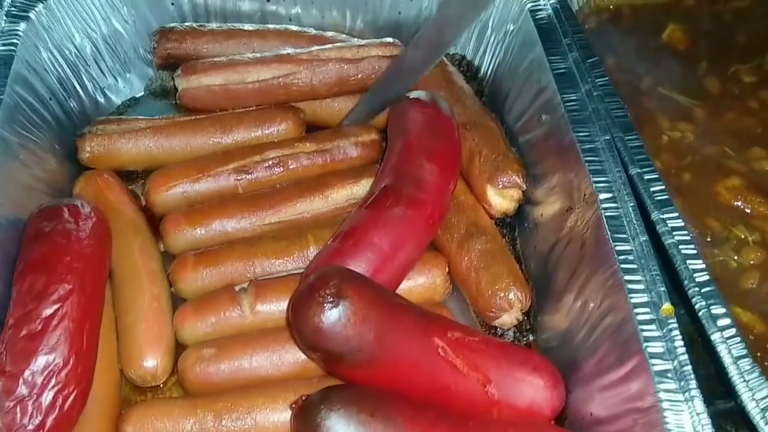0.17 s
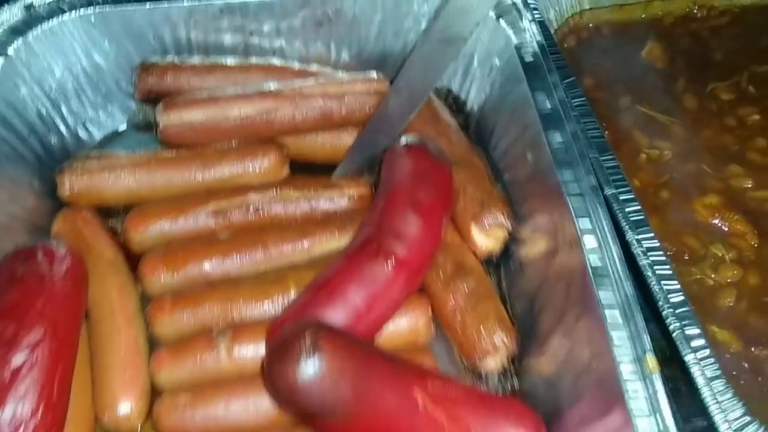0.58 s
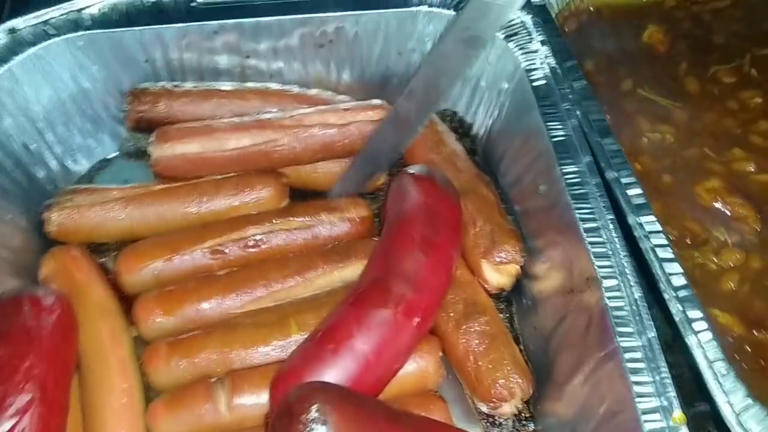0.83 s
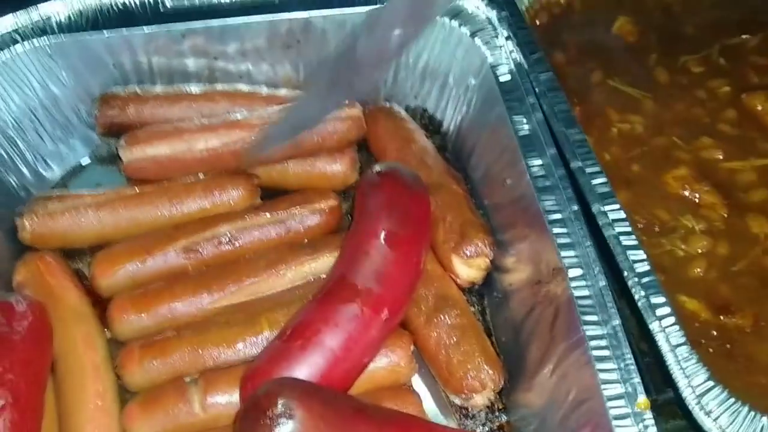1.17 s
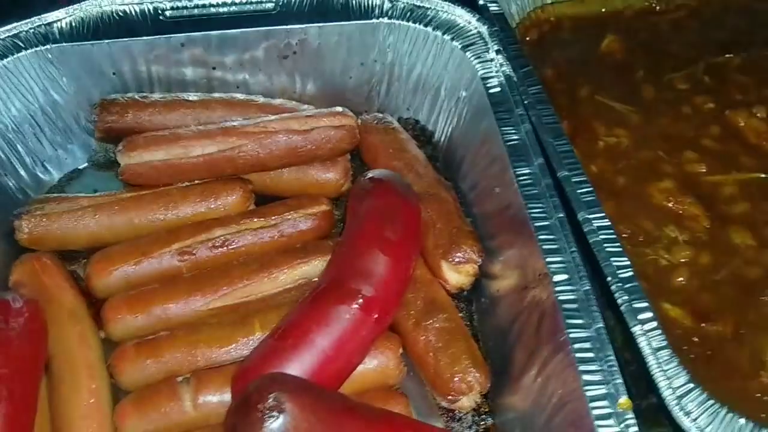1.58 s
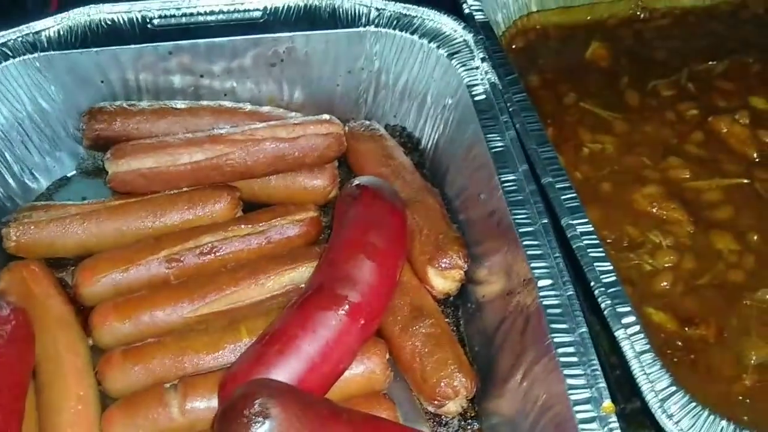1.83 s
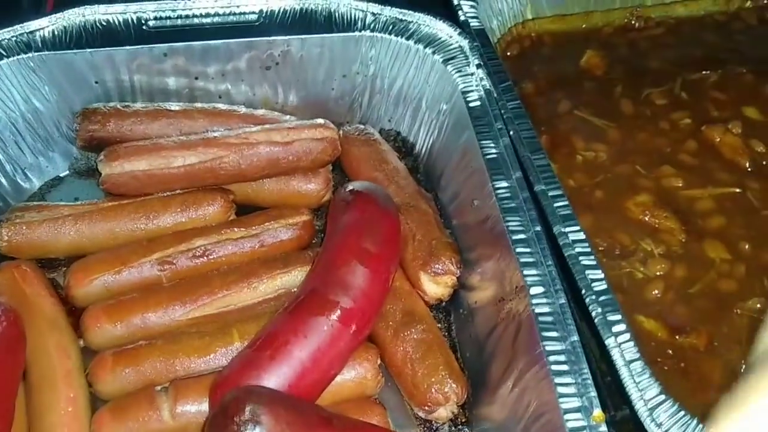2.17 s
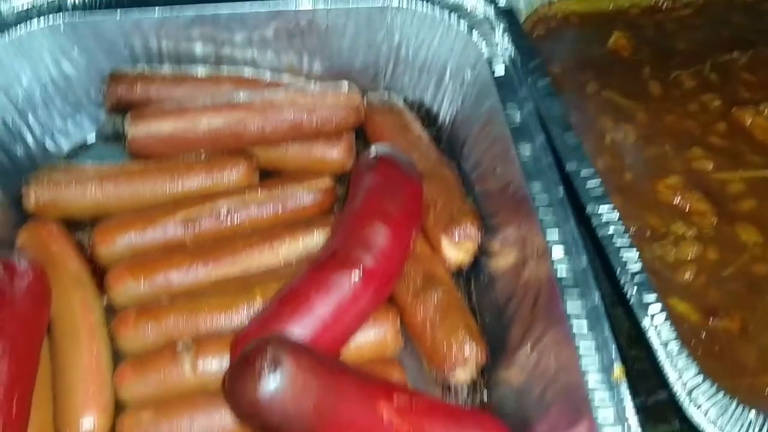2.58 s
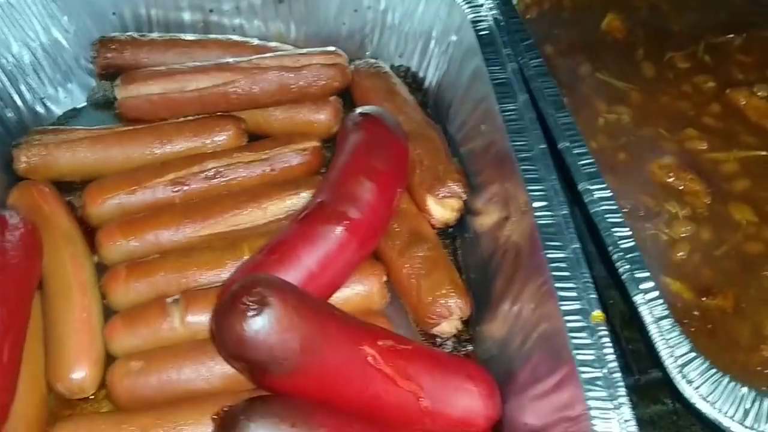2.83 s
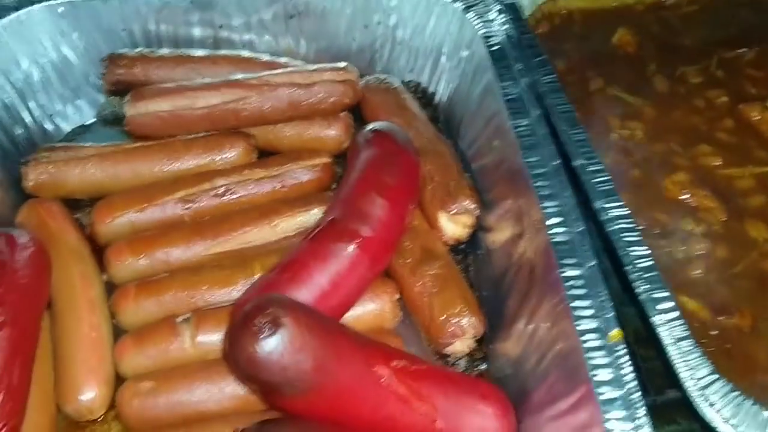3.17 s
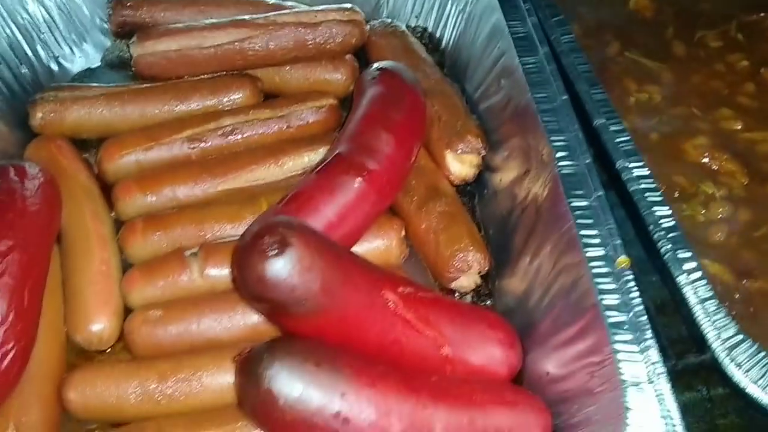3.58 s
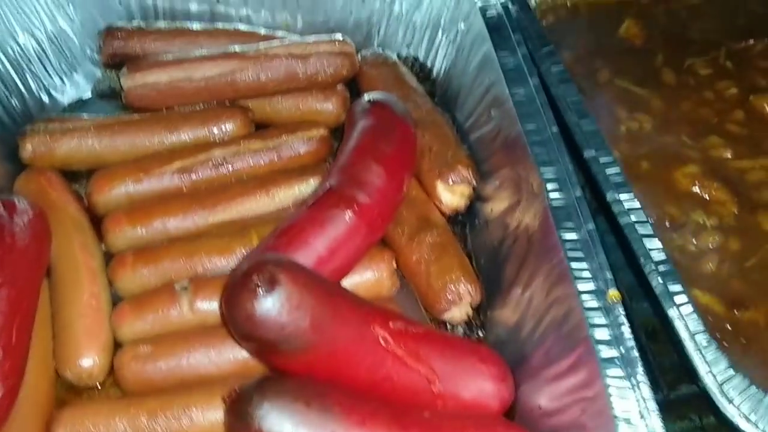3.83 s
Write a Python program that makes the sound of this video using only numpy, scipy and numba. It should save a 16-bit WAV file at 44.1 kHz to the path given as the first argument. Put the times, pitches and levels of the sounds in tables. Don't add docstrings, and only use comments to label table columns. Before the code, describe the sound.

Close, crinkly knocks and short sticky scrapes of a blade on an aluminium tray, with buckling pops and quiet pauses in a humming kitchen.

```python
import sys
import numpy as np
from scipy import signal
from scipy.fft import rfft, irfft
from scipy.io import wavfile
from scipy.ndimage import uniform_filter1d
from numba import njit

SR = 44100
rng = np.random.default_rng(int(sys.argv[2]) if len(sys.argv) > 2 else 0)


def waveform_to_disk(signal):
    frames = np.transpose(np.atleast_2d(signal))
    scaled = np.clip(frames, -1, 1) * 32767
    samples = np.round(scaled).astype(np.int16)
    wavfile.write(sys.argv[1], SR, samples)


def rack_gain(trim_db):
    fader = np.asarray(trim_db, float)
    return 10 ** (fader / 20)


N = 176708

# start_s, length_s, pressure_db, patch_pitch_hz, brightness_db
STROKES = [(0.467, 0.099, -43, 870, 8.5), (0.588, 0.019, -33, 900, -4), (0.616, 0.021, -33.5, 860, 2),
           (0.643, 0.11, -26, 860, 1), (0.723, 0.071, -36.5, 610, -1), (0.769, 0.23, -31, 760, -2.5),
           (0.912, 0.049, -32.5, 1180, -1.5), (1.229, 0.016, -28, 1111, -10.5),
           (1.719, 0.031, -29.5, 800, 11), (2.125, 0.021, -36, 897, -2), (2.442, 0.035, -46.5, 635, -18),
           (2.507, 0.16, -51, 790, -2), (2.697, 0.022, -41.5, 855, -6), (2.731, 0.075, -32, 743, -4.5),
           (2.822, 0.074, -30.5, 774, -5), (3.539, 0.025, -20, 744, -13)]
# centre_s, half_width_s, pressure_db, patch_pitch_hz, brightness_db
SWELLS = [(1.032, 0.013, -29, 1150, -2.5), (1.064, 0.021, -44.5, 1190, -25), (1.097, 0.026, -24.5, 1130, 2),
          (1.447, 0.024, -56.5, 1110, -25.5), (2.222, 0.024, -37.5, 785, 1.5), (3.373, 0.03, -51, 765, -29),
          (3.422, 0.019, -34, 760, -11.5), (3.469, 0.017, -32.5, 915, -8.5),
          (3.502, 0.0112, -30, 1000, -18), (3.528, 0.011, -31.5, 1060, -3), (3.587, 0.034, -43.5, 774, -2),
          (3.764, 0.017, -45, 765, 15), (3.795, 0.024, -41, 900, 12), (0.665, 0.0032, -44, 1000, -11),
          (3.988, 0.034, -75, 599, 25.5)]
BODY_SIDE_DB = -8
CLANG_SHARE = 0.57


def unit(x):
    return x / np.sqrt(np.mean(x ** 2))


def band(x, hz, width):
    low = np.sqrt(hz ** 2 + width ** 2 / 4) - width / 2
    edges = [low, min(low + width, 0.45 * SR)]
    return signal.sosfilt(signal.butter(2, edges, "bandpass", fs=SR, output="sos"), x)


def fade(t60, count):
    return rack_gain(-60 * np.arange(count) / SR / np.clip(t60, 0.01, 1.0))


def place(track, sound, start_s):
    i = int(start_s * SR)
    track[:, i:i + sound.shape[-1]] += sound


@njit
def moving_band(x, hz, share):
    out, band_state, low_state = np.empty(len(x)), 0.0, 0.0
    for i in range(len(x)):
        g = np.tan(np.pi * hz[i] / SR)
        v = (band_state + g * (x[i] - low_state)) / (1 + g * (g + share))
        band_state = 2 * v - band_state
        low_state = low_state + 2 * g * v
        out[i] = share * v
    return out


def clicks(per_s, spread_db, count):
    chance = rng.random((3, count))
    happens = chance[0] < per_s / SR
    size = rack_gain(-spread_db * np.log(chance[2]))
    return unit(happens * np.sign(chance[1] - 0.5) * size + 1e-9)


def foil(force, hz, width, t60, side_db, direct=0.76, count=4):
    size, hold = SR // 4, int(SR / 14)
    modes = rng.standard_normal((count, 2, size)) * fade(t60, size)
    modes /= np.sqrt(np.sum(modes ** 2, axis=2, keepdims=True))
    modes[..., 0] += direct
    modes = band(modes, hz, width)
    modes /= np.sqrt(np.sum(modes ** 2, axis=2, keepdims=True))
    visited = np.repeat(rng.integers(0, count, N // 100), hold)[:N]
    patch = visited == np.arange(count)[:, None]
    share = np.sqrt(np.abs(uniform_filter1d(1.0 * patch, hold // 2)))
    ringing = signal.fftconvolve((force * share)[:, None], modes, axes=2)[..., :N].sum(axis=0)
    return ringing * [[1], [rack_gain(side_db)]]


def base_swing(t, peak_s):
    length_s = 0.00061
    return -np.cos(2 * np.pi * 990 * (t - peak_s)) * np.exp(-((t - peak_s) / length_s) ** 2)


def boom_db(hz):
    return -7.5 * np.log2(np.clip(hz, 780, 1500) / 850)


def kitchen():
    # pitch_hz, level_db (per Hz)
    air_colour = [(40, -31.5), (100, -11), (250, -6.5), (450, -11.5), (800, -16), (1100, -28.5),
                  (3500, -35.5), (9000, -46.5)]
    # pitch_hz, width_hz, level_db
    hum_tones = [(55.4, 6.7, -68), (91.7, 9.5, -64), (117, 8.5, -66.5), (244.5, 23, -56), (398, 3, -70),
                 (465, 13.4, -69.5), (637.5, 29, -62.5), (712, 8.9, -73), (753, 3.2, -71.5)]
    hz = np.fft.rfftfreq(N, 1 / SR) + 1
    point_hz, point_db = np.transpose(air_colour)
    colour = rack_gain(np.interp(np.log(hz), np.log(point_hz), point_db))
    air = unit(irfft(rfft(rng.standard_normal((2, N))) * colour, N)) * rack_gain(-57.5)
    hum = sum(rack_gain(db) * unit(band(rng.standard_normal((2, N)), f, w)) for f, w, db in hum_tones)
    return (air + hum) * rack_gain(np.array([[3], [6.5]]))


def walls(pan):
    return rack_gain(-22) * foil(pan[0], 2400, 4300, t60=0.31, side_db=0, direct=0, count=1)


def squeak():
    # pitch_hz, width_hz, level_db
    squeak_tones = [(5830, 150, -66), (5100, 85, -71), (10020, 340, -72), (11800, 240, -75)]
    centre_s, rise_s = 3.995, 0.024
    swell = np.exp(-((np.arange(N) / SR - centre_s) / rise_s) ** 2)
    return swell * sum(rack_gain(db) * unit(band(rng.standard_normal((2, N)), hz, w)) for hz, w, db in squeak_tones)


def blade_rings():
    # pitch_hz, level_db, t60_s
    blade_tones = [(1240, -15, 0.078), (1920, -9, 0.05), (3060, -5.5, 0.025), (2930, -19, 0.028),
                   (6160, -10, 0.011)]
    # start_s, peak_db
    blade_taps = [
        (1.236, -38),
        (2.135, -25.5),
        (2.206, -20.5),
        (3.623, -26),
    ]
    out, size = np.zeros((2, N + SR)), SR // 10
    t = np.arange(size) / SR
    ring = sum(rack_gain(db) * np.sin(2 * np.pi * hz * t) * fade(t60, size) for hz, db, t60 in blade_tones)
    for s, db in blade_taps:
        place(out, ring * rack_gain(db) * [[1], [0.4]], s)
    return out[:, :N]


def pops():
    # start_s, peak_db
    base_pops = [
        (0.7231, -3.3),
        (1.0915, -17),
        (1.1075, -15),
        (1.2335, -22),
        (1.7182, -17),
        (1.7235, -17),
        (2.742, -24),
        (2.755, -24),
        (3.5445, -13),
        (3.563, -19),
    ]
    out = np.zeros((2, N + SR))
    t = np.arange(SR // 10) / SR
    peak_s = 0.002
    for s, db in base_pops:
        place(out[:1], base_swing(t, peak_s) * rack_gain(db), s - peak_s)
    return out[:, :N]


def snaps():
    # start_s, peak_db
    crease_snaps = [(0.478, -40), (0.4859, -30), (0.591, -48), (0.615, -32), (0.6495, -45), (0.6735, -27),
                    (0.6956, -22), (0.7166, -26), (0.7252, -19.5), (0.9356, -30), (0.975, -31),
                    (1.015, -41), (1.028, -44), (1.0846, -27), (1.0929, -30), (1.1958, -35.5),
                    (1.2312, -37), (1.718, -14.5), (2.1327, -25.5), (2.2018, -26), (2.454, -48),
                    (2.7046, -49), (2.7413, -44), (2.7554, -33), (2.776, -28.5), (2.797, -35), (2.834, -21),
                    (3.237, -53.5), (3.396, -50), (3.4176, -56), (3.4745, -53), (3.527, -38), (3.5434, -26),
                    (3.5643, -19.5), (3.6193, -49)]
    out, size = np.zeros((2, N + SR)), SR // 10
    for s, db in crease_snaps:
        crack = band(rng.standard_normal((2, size)) * fade(0.021, size), 6200, 13800)
        place(out, crack * rack_gain(db - 0.5) / np.max(np.abs(crack)), s)
    return out[:, :N]


def rings():
    # start_s, pitch_hz, peak_db, t60_s
    pan_rings = [(0.487, 690, -23, 0.12), (0.487, 854, -23, 0.082), (0.487, 1038, -19, 0.077),
                 (0.487, 2710, -19, 0.031), (0.724, 395, -19.5, 0.17), (0.724, 618, -14.5, 0.06),
                 (0.724, 825, -27, 0.22), (1.034, 1230, -23, 0.086), (1.084, 1158, -17.5, 0.064),
                 (1.086, 1021, -21, 0.13), (1.086, 836, -32, 0.1), (1.095, 3120, -35, 0.05),
                 (1.1, 689, -24.5, 0.15), (1.108, 854, -21.5, 0.088), (1.232, 1450, -40, 0.036),
                 (1.232, 1054, -33, 0.06), (1.232, 2580, -27, 0.035), (1.7225, 660, -20.5, 0.06),
                 (1.7225, 896, -20, 0.11), (1.716, 236.3, -28.5, 0.24), (1.716, 395, -31.5, 0.088),
                 (2.131, 944, -33, 0.051), (2.131, 630, -38, 0.14), (2.207, 654, -40, 0.16),
                 (2.74, 833, -32, 0.082), (2.74, 1138, -26, 0.077), (2.755, 764, -27, 0.063),
                 (2.776, 840, -31, 0.06), (2.837, 639, -21, 0.11), (2.837, 876, -22.5, 0.11),
                 (2.836, 1170, -27.5, 0.095), (3.492, 813, -31.5, 0.084), (3.525, 1153, -28, 0.05),
                 (3.544, 832, -23, 0.062), (3.544, 614, -20.5, 0.065), (3.544, 1164, -26, 0.067),
                 (3.544, 1417, -24, 0.05), (3.563, 762, -21, 0.094), (3.563, 835, -32, 0.13),
                 (3.563, 556, -30, 0.09), (3.621, 1780, -28.5, 0.047), (3.621, 3300, -50, 0.05),
                 (3.621, 946, -22.5, 0.035), (3.69, 258, -31, 0.15), (3.752, 240, -35, 0.073),
                 (3.786, 913, -34.5, 0.13), (3.79, 251, -32.5, 0.21), (0.922, 1400, -26.5, 0.045),
                 (0.593, 990, -27.5, 0.06), (2.454, 630, -42.5, 0.053),
                 (0.617, 2800, -33, 0.05), (0.619, 900, -27, 0.094), (0.885, 865, -37, 0.044),
                 (0.93, 3450, -34, 0.044), (1.013, 2670, -36, 0.04), (1.035, 2573, -33, 0.05),
                 (1.083, 2566, -24.5, 0.055), (1.195, 2720, -39, 0.026), (1.25, 700, -43.5, 0.1),
                 (1.275, 626, -34.5, 0.06), (1.74, 2820, -37, 0.071), (1.735, 5216, -40, 0.044),
                 (1.755, 640, -34, 0.11), (2.834, 3100, -36, 0.04), (2.833, 1800, -29, 0.05),
                 (2.953, 2950, -57, 0.032), (3.348, 880, -47, 0.033), (3.402, 850, -38, 0.055),
                 (3.462, 880, -36, 0.06), (3.474, 2550, -35, 0.03), (3.493, 2450, -32, 0.03),
                 (3.505, 2700, -46, 0.03), (3.543, 2400, -21, 0.04), (3.562, 2430, -28, 0.065),
                 (3.919, 674, -49, 0.04), (3.983, 620, -54, 0.05), (0.498, 565, -23, 0.073),
                 (0.53, 690, -31.5, 0.077), (0.723, 516, -25.5, 0.11), (2.54, 2680, -56.5, 0.12),
                 (2.756, 2920, -47, 0.045), (2.776, 2860, -45, 0.05), (2.799, 870, -34, 0.045),
                 (0.731, 630, -18, 0.076), (3.778, 626, -41.5, 0.12), (0.94, 240, -32.5, 0.31),
                 (1.236, 258.5, -30, 0.1), (2.74, 231, -30.5, 0.32)]
    out, size = np.zeros((2, N + SR)), SR // 4
    t = np.arange(size) / SR
    rise = 1 - np.exp(-t / 0.00072)
    for s, hz, db, t60 in pan_rings:
        ring = rack_gain(db) * np.sin(2 * np.pi * hz * t) * fade(t60, size) * rise
        place(out, ring * [[1], [rack_gain(-11)]], s)
    return out[:, :N]


def foil_ranges(force):
    # centre_hz, width_hz, t60_s, side_db (difference of the ports)
    boom_range = (256.5, 146, 0.28, -4)
    clang_range = (2420, 1700, 0.046, 3.4)
    rim_range = (4450, 1100, 0.04, 1)
    hiss_range = (11503, 9004, 0.075, -1.5)
    rasp_range = (6500, 5400, 0.13, 0.82)
    thud_range = (65, 207, 0.29, 2)
    boom, clang, hiss = force
    out = foil(boom, *boom_range) + foil(clang, *clang_range) + foil(hiss, *hiss_range)
    out = out + rack_gain(-2) * foil(hiss, *rasp_range)
    out = out + rack_gain(-5.5) * foil(boom, *thud_range, count=1)
    out = out + rack_gain(-12) * foil(clang, *rim_range)
    shimmer = foil(hiss, 9999, 9999, t60=0.5, side_db=-3, direct=0, count=1)
    return out + rack_gain(-25.5) * shimmer


def pressure():
    press_s, sag_db_per_s, lift_db_per_s = 0.008, 45.5, 503
    t = np.arange(N) / SR
    s, length = np.transpose(STROKES)[:2, :, None]
    sag = sag_db_per_s * np.clip(t - s, 0, 1)
    lift = lift_db_per_s * np.clip(t - s - length, 0, 1)
    strokes = np.clip((t - s) / press_s, 0, 1) * rack_gain(-sag - lift)
    s, half = np.transpose(SWELLS)[:2, :, None]
    return np.vstack([strokes, np.exp(-((t - s) / half) ** 2)])


def drags():
    db, hz, bright_db = np.transpose(STROKES + SWELLS)[2:, :, None]
    press = pressure() * rack_gain(db) + 1e-9
    gain = press.sum(axis=0)
    centre_hz = (press * hz).sum(axis=0) / gain
    bright = rack_gain(np.outer([0, CLANG_SHARE, 1], bright_db)) @ press
    bright[0] *= rack_gain(boom_db(centre_hz))
    slips = clicks(4500, 3.2, N)
    patch = unit(moving_band(slips, centre_hz, 0.9))
    rub = foil(patch * gain, 884, 2400, t60=0.06, side_db=BODY_SIDE_DB) / np.sqrt(SR / 2 / 1400)
    range_db = np.array([[-5.5], [-10.5], [-17]])
    return rub, slips * bright * rack_gain(range_db)


def knocks():
    # start_s, peak_db, patch_pitch_hz, brightness_db
    blade_knocks = [(0.482, -27.5, 1100, 12), (0.487, -19.5, 754, 16.5), (0.498, -19, 980, 7),
                    (0.593, -24.5, 1010, -4), (0.618, -21.5, 780, -7), (0.65, -41, 860, 1),
                    (0.677, -25, 990, 16), (0.7256, -14, 565, -5), (0.885, -33, 910, -4),
                    (0.931, -30, 890, 13.5), (1.012, -23, 1115, -8), (1.093, -18.5, 1210, 20),
                    (1.109, -52, 1020, -10), (1.196, -30, 1240, -7), (1.2318, -20.5, 1410, 5.5),
                    (1.7172, -17.5, 760, -9), (1.723, -41, 750, -60.5), (2.133, -34.5, 950, 20.5),
                    (2.205, -40, 1230, 28.5), (2.74, -26.5, 770, 6.5), (2.755, -35, 720, 17),
                    (2.776, -28, 860, 12.5), (2.833, -25.5, 970, 21), (2.841, -23, 790, 21),
                    (3.527, -25, 1160, 4), (3.544, -20.5, 1010, 12.5), (3.563, -21.5, 876, 17),
                    (3.622, -24.5, 1400, 7.5), (3.692, -38, 280, -54), (3.753, -33, 245, -40)]
    # start_s, peak_db
    light_ticks = [(0.697, -21), (0.977, -46), (1.281, -38.5), (2.454, -46), (2.527, -45), (2.708, -58),
                   (2.798, -29.5), (2.866, -23.5), (2.954, -46.5), (3.233, -49), (3.349, -59), (3.4, -40.5),
                   (3.419, -36), (3.467, -32), (3.492, -33.5), (3.92, -67), (3.983, -65)]
    pan_hz = [240, 395, 615, 640, 670, 750, 825, 906, 960, 1086, 1147, 1246, 1400, 1620]
    body, force, size = np.zeros((2, N + SR)), np.zeros((3, N + SR)), SR // 6
    t = np.arange(size) / SR
    blow = base_swing(t, 0.00122)
    for s, db, hz, bright_db in blade_knocks + [(*tick, 863.6, 11) for tick in light_ticks]:
        chance = rng.standard_normal((4, 14))
        t60 = 0.044 * rack_gain(0.6 * (db + 14.5))
        modes_hz = pan_hz * np.exp(0.004 * chance[0])
        near = np.exp(-(np.log(modes_hz / hz) / 0.22) ** 2)[:, None]
        decays = [fade(t60 * np.exp(0.29 * c), size) for c in chance[1]]
        tones = near * np.sin(2 * np.pi * np.outer(modes_hz, t)) * decays
        ring = np.array([(1.31 + chance[2]) @ tones, rack_gain(BODY_SIDE_DB) * chance[3] @ tones])
        ring *= 1 - np.exp(-t / 0.0022)
        ring /= np.max(np.abs(ring[0]))
        ring[0] -= 0.23 * rack_gain(0.18 * (db - 6.0)) * blow
        place(body, ring * rack_gain(db - 1.5), s)
        run = clicks(3000, 1.95, size) * fade(0.67 * t60, size)
        run *= 1.42 / np.sqrt(np.sum(run ** 2))
        run[0] = 1
        range_db = np.array([[boom_db(hz) - 9], [CLANG_SHARE * bright_db - 7.5], [bright_db - 26.5]])
        place(force, run * rack_gain(db + range_db) * 4, s)
    return body[:, :N], force[:, :N]


def scene():
    body, blows = knocks()
    rub, slips = drags()
    pan = body + rub + snaps() + pops() + blade_rings() + rings() + squeak()
    pan = pan + foil_ranges(blows + slips)
    pan = signal.sosfilt(signal.butter(4, 74, "highpass", fs=SR, output="sos"), pan)
    mid, side = pan + walls(pan)
    return np.array([mid + side, rack_gain(1.0) * (mid - side)]) + kitchen()


def low_pass(x):
    return signal.sosfilt(signal.butter(12, 16790, fs=SR, output="sos"), x)


def record(dry):
    # pitch_hz, width_hz, share removed (0 to 1)
    port_dips = [(4420, 300, 0.3), (8850, 600, 0.5), (11050, 400, 0.3), (13300, 400, 0.3)]
    lag = 20
    late = np.pad(dry[::-1], ((0, 0), (lag, 0)))[:, :N]
    wide = (dry - 0.58 * late) / 1.958
    wide = wide - sum(share * band(wide, hz, width) for hz, width, share in port_dips)
    wide = signal.sosfilt(signal.ellip(7, 0.5, 27, 15500, fs=SR, output="sos"), wide)
    return low_pass(wide)


dry = scene()
out = record(dry)
waveform_to_disk(out)
```